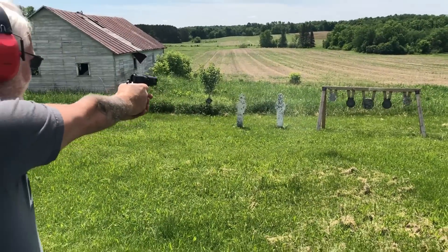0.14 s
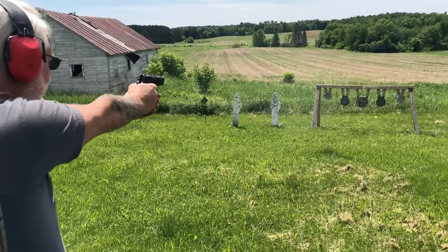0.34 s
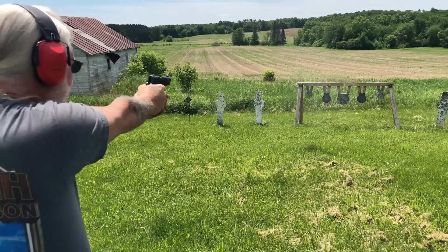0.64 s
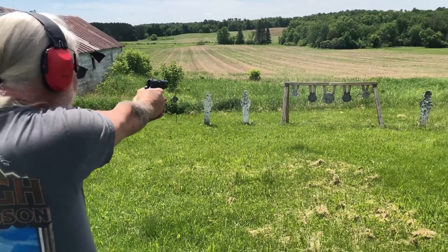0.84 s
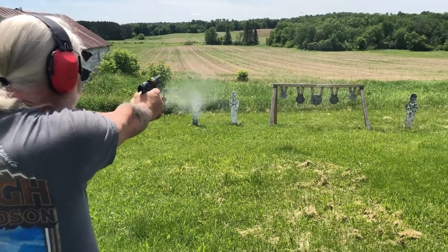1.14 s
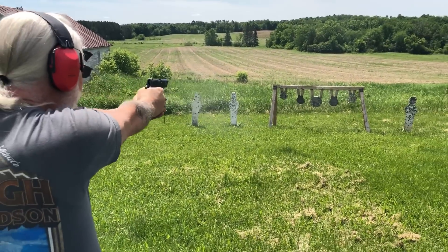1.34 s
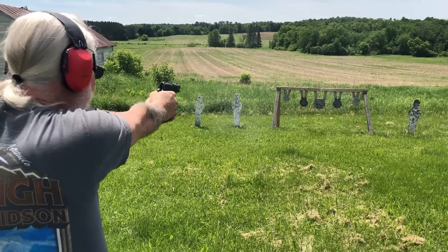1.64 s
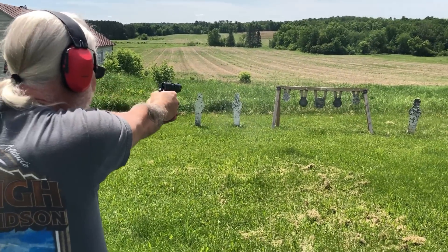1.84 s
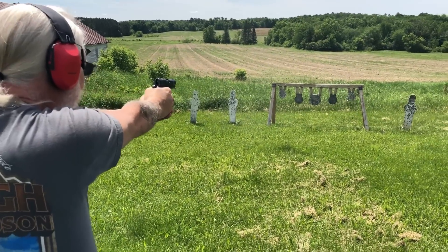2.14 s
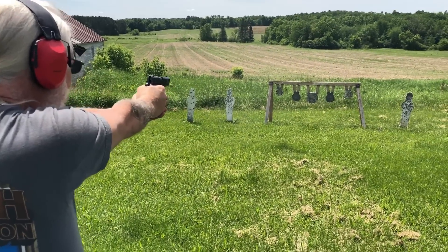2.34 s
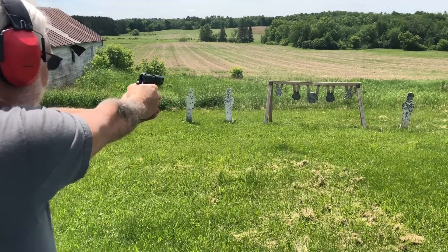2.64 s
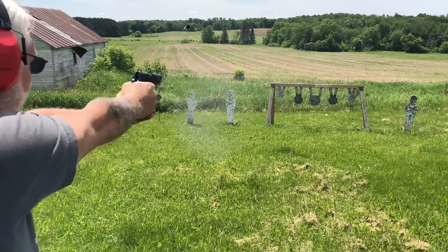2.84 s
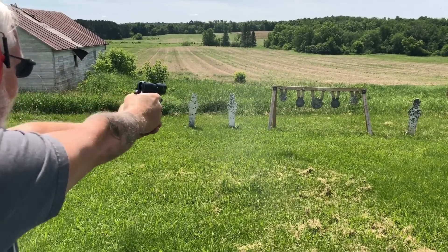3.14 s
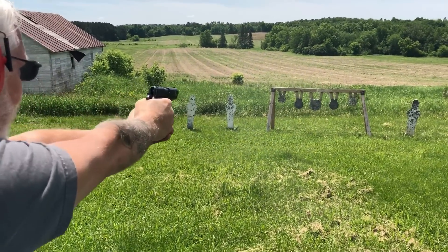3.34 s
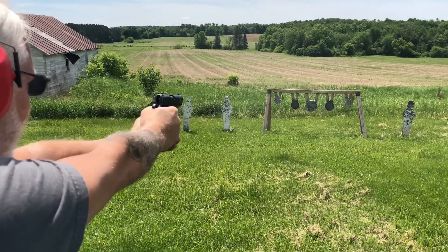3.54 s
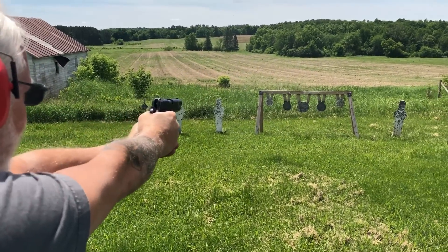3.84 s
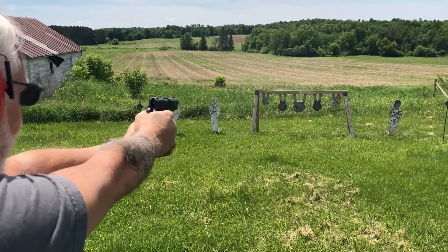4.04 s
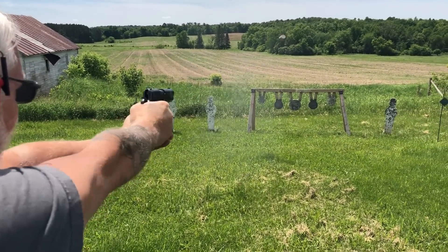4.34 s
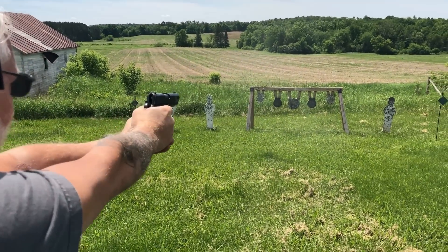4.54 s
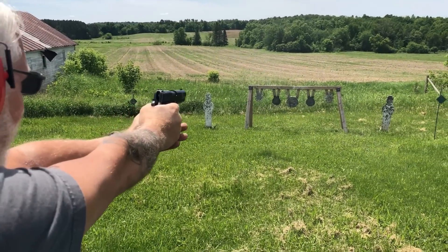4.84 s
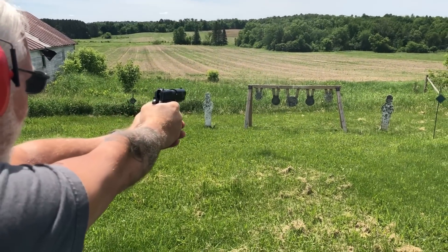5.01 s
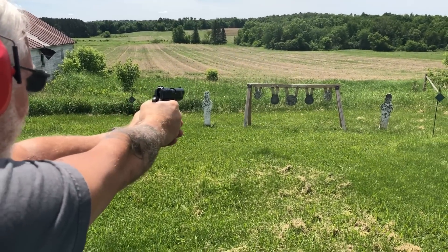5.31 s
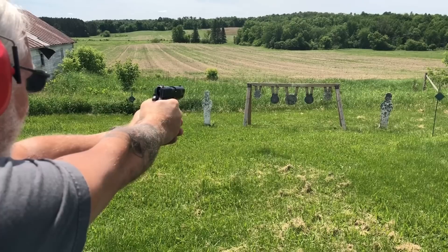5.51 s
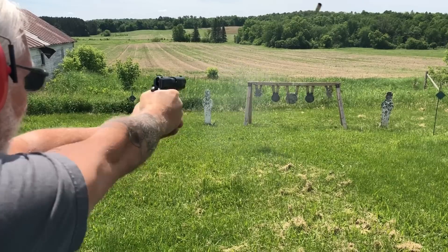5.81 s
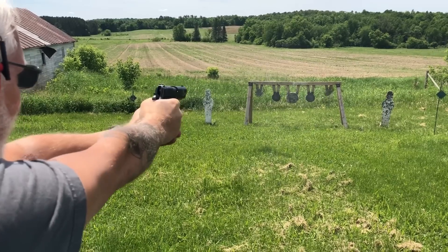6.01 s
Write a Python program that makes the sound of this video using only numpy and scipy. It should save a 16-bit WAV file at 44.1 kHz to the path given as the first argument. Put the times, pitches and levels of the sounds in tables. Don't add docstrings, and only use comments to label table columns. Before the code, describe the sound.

A handgun fires four single shots about one and a half seconds apart in an open grassy field. Each is a sharp overloaded crack with a short low boom, a target smack almost at once, and echoes rolling off barn and trees. The first and last hits ping on steel. Between them are a faint murmur and tiny clicks, captured on a phone just behind the shooter.

```python
import sys
import numpy as np
from scipy import signal
from scipy.fft import rfft, irfft
from scipy.io import wavfile
from scipy.ndimage import uniform_filter1d

SR = 44100
rng = np.random.default_rng(int(sys.argv[2]) if len(sys.argv) > 2 else 0)


def master(y):
    cut = np.clip(np.atleast_2d(y).T, -1, 1)
    pcm = np.round(cut * 32767)
    wavfile.write(sys.argv[1], SR, pcm.astype(np.int16))


def gain_from_decibels(decibels):
    exponent = np.asarray(decibels, float) / 20
    return 10 ** exponent


N = 272097

# start in seconds, muzzle pulse in dB, blast in dB, bullet strike in dB,
# ms until the limiter lets the hiss back.
SHOTS = [
    (1.327, -6.5, 3, 4.5, 101),
    (2.933, -19, 1.5, 0.5, 86),
    (4.445, -11, 1.5, 2.5, 86),
    (5.900, -10, 0, 2.5, 83.4),
]
# thump in dB, swell before the strike in dB, returning hiss in dB,
# its rise in ms per 10 dB, bright tail in dB.
SHOT_RETURNS = [(-6, -3.5, -2.5, 23.5, 3.5), (1, 0.5, 1.5, 8.5, 1.5), (5, 0, 3, 7.5, -1.5),
                (1.5, 3, -1, 15, -1)]
# delay in seconds, body in dB, thump in dB, rise and fall in ms per 10 dB.
BOOM_RETURNS = [(.107, -16.5, -45, 13, 12), (0.129, -17.5, -38, 7, 11), (0.147, -26.5, -44.5, 9, 38),
                (.235, -35.5, -52.5, 16, 39), (.300, -46.5, -67.5, 18, 97)]
# delay in seconds, crack in dB, hiss in dB, rise and fall in ms per 10 dB.
CRACK_RETURNS = [(0.125, -25.5, -28.5, 25.5, 44.5), (.230, -42.5, -54, 34, 44),
                 (.330, -60.5, -70, 30, 101.5)]
# delay in seconds, roll in dB, rustle in dB, rise and fall in ms per 10 dB.
FAR_RETURNS = [(.46, -59, -63, 40, 298), (.95, -53.5, -64.5, 33.5, 298), (1.10, -53, -70.5, 80, 101.5),
               (1.25, -52, -71, 81, 108.5), (1.41, -53, -61.5, 10, 259), (1.52, -54, -60, 39, 98.5),
               (1.70, -47, -61, 60.5, 157.5), (1.81, -48.5, -58, 41, 251)]
# frequency in Hz, width in Hz, level in dB.
BLAST_RESONANCES = [(210, 33, -17.5), (493, 170, -6.5), (843, 300, -1), (1204, 790, -4)]
# start in seconds, ring in dB, ms until the limiter has let go.
STEEL_HITS = [
    (1.388, -21, 38),
    (5.971, -17.5, 7.3),
]
# frequency in Hz, level in dB, t60 in seconds.
FIRST_PLATE = [(3537, -11.5, 0.56), (4130, -30, 0.35), (5529, -26.5, 0.3), (6166, 5, 0.27),
               (6158, -33, 0.99), (7470, -36, 0.4), (8200, -13, 0.29), (9180, -21, 0.22), (13700, -9, 0.12)]
SECOND_PLATE = [(3600, -18.5, 0.42), (4950, -17, 0.37), (6210, -14, 0.4), (7500, -24, 0.4),
                (4420, -22, 0.22), (5240, -34, 0.6), (5850, 0, 0.12), (6220, -5, 0.076), (8720, 0.5, 0.22),
                (9410, -14, 0.35), (11330, -7, 0.21), (14020, -11, 0.19), (14900, -30, 0.24)]
# frequency in Hz, density in dB per Hz.
FIELD_COLOUR = [(18, -44), (30, -25), (86, -3.5), (134, -7), (215, -17), (280, -17), (600, 3), (913, 1.5),
                (2540, -20), (2750, -19), (3980, -25), (7670, -44.5), (14400, -42), (16000, -42)]
# roll in dB, rustle in dB, rumble in dB.
MURMUR = [(-59.5, -68, -77.5), (-61, -70, -78.5), (-57.5, -71, -79), (-58, -75, -80), (-61, -69, -79)]
# start in seconds, length in seconds, level in dB.
AIRY_SPELLS = [(.0, 0.29, -83), (0.296, 0.45, -90), (.72, 0.19, -83), (.95, .04, -81), (1.01, .05, -74),
               (1.095, .05, -79), (1.76, .12, -82), (2.26, 0.24, -86), (2.606, .06, -82), (3.72, .03, -83.5),
               (4.32, .05, -89), (5.097, .008, -72), (5.297, .008, -78)]
# start in seconds, peak in dB, frequency in Hz.
TICKS = [(1.689, -48.5, 2360), (1.7794, -57, 1740), (1.847, -43, 2870), (1.8796, -63, 1990),
         (3.309, -51, 1500), (3.4531, -50, 1502), (3.483, -59.5, 2130), (4.3264, -49, 5000),
         (4.3694, -46, 2240), (4.4046, -37, 1670), (5.0974, -60, 1588), (5.299, -53, 1930),
         (5.6994, -65, 1690), (5.7694, -65, 1730)]
# start in seconds, level in dB, frequency in Hz, t60 in seconds.
KNOCKS = [(3.670, -48.5, 101, 0.14), (3.675, -48, 210, 0.085), (4.512, -22.5, 62, 0.13),
          (5.53, -60, 50, .15)]
# centre in seconds, top in Hz, slope in Hz per second, half length in seconds, level in dB.
CHIRPS = [
    (5.704, 5770, 99400, .004, -70),
    (5.768, 7200, 230000, 0.007, -66.5),
]
# centre in seconds, edge in Hz, floor in dB, two kept lines in
# Hz.
LOUD_GAPS = [(1.341, 1740, -30, 4190, 5706), (1.365, 2000, -7, 7900, 6305), (1.530, 6550, -9, 9200, 8500),
             (1.578, 2300, -19, 4270, 8500), (1.625, 2500, -19, 9200, 8500),
             (2.966, 3500, -14, 5430, 8600), (3.034, 1770, -6, 4880, 12200),
             (3.187, 2476, -29, 10800, 9100), (4.486, 4000, -22, 6940, 8800),
             (6.082, 1900, -22, 4950, 3600), (6.100, 6400, -14, 7500, 14020)]
# centre in seconds, edge in Hz.
QUIET_GAPS = [(.262, 5060), (.518, 4500), (.553, 4240), (.927, 2500), (.998, 3000), (1.075, 2800),
              (1.895, 4000), (2.180, 3500), (2.238, 4500), (2.371, 3980), (3.397, 3060), (3.591, 4000),
              (3.540, 5500), (3.803, 4400), (3.835, 4400), (4.262, 4000), (4.292, 3000), (5.250, 3500),
              (5.329, 2000), (5.630, 3400)]

EARLIER_SHOT_S = -0.583
BLAST_S, STRIKE_S, SWELL_S = 0.003, 0.0605, 0.050


def band(low_hz, high_hz, order=2):
    sos = signal.butter(order, [low_hz, high_hz], "band", fs=SR, output="sos")
    x = signal.sosfilt(sos, rng.standard_normal(N))
    return x / np.std(x)


def drift(rate_hz):
    r = np.exp(-2 * np.pi * rate_hz / SR)
    slow = signal.lfilter([1], [1, -2 * r, r * r], rng.standard_normal(N + SR))[SR:]
    return slow / np.std(slow)


def ring(clicks, hz, t60_s):
    r = gain_from_decibels(-60 / (t60_s * SR))
    w = 2 * np.pi * hz / SR
    return signal.lfilter([0, np.sin(w)], [1, -2 * r * np.cos(w), r * r], clicks + 1e-18)


def click(s):
    return 1. * (np.arange(N) == round(s * SR))


def louder(row, db, second_db=0):
    return (row[0], row[1] + db, row[2] + db + second_db, *row[3:])


def since_shot():
    times = np.array([EARLIER_SHOT_S] + [row[0] for row in SHOTS])
    t = np.arange(N) / SR
    latest = np.searchsorted(times, t) - 1
    return times, latest, t - times[latest]


def arrivals(times, rows_per_shot, lead_s):
    power = np.zeros((2, N))
    for shot_s, rows in zip(times, rows_per_shot):
        first = max(round((shot_s - lead_s) * SR), 0)
        for delay_s, first_db, second_db, rise_ms, fall_ms in rows:
            s = shot_s + delay_s
            last = min(round((s + fall_ms / 200) * SR), N)
            near = np.arange(first, last)
            ms = 1000 * (near / SR - s)
            rise_db = 10 * ms / max(rise_ms, .1)
            fall_db = -10 * ms / max(fall_ms, .1)
            shape_db = np.where(ms < 0, rise_db, fall_db)
            power[:, near] += gain_from_decibels(shape_db + np.array([[first_db], [second_db]])) ** 2
    return np.sqrt(power)


def field():
    times, latest, age_s = since_shot()
    t = np.arange(N) / SR
    roll, rustle = arrivals(times, [FAR_RETURNS] * len(times), 0) * (np.minimum(age_s, 1) > .25)

    layers = np.zeros((4, N))
    edges_hz = 30 * 2 ** np.arange(0, 9.1, .5)
    together = drift(14)
    colour_hz, colour_db = np.transpose(FIELD_COLOUR)
    for low_hz, high_hz in zip(edges_hz, edges_hz[1:]):
        hz = np.sqrt(low_hz * high_hz)
        level_db = np.interp(np.log(hz), np.log(colour_hz), colour_db) + 10 * np.log10(hz)
        lumps_db = 0.83 * together + 2.1 * drift(25)
        layers[np.searchsorted([300, 1700, 7000], hz)] += gain_from_decibels(level_db + lumps_db) * band(low_hz, high_hz)

    motor = ring(rng.standard_normal(N), 120, 2.2 / 33)
    layers[0] += gain_from_decibels(-4) * motor * np.std(layers[0]) / np.std(motor)

    roll_db, rustle_db, rumble_db = np.array(MURMUR)[latest].T
    spells = sum(gain_from_decibels(db) * ((t > s) & (t < s + length_s)) for s, length_s, db in AIRY_SPELLS)
    gains = [gain_from_decibels(rumble_db + 9.5 * age_s),
             np.hypot(roll, gain_from_decibels(roll_db)),
             np.hypot(rustle, gain_from_decibels(rustle_db)),
             uniform_filter1d(spells, size=200) + gain_from_decibels(-94.5 + 3 * drift(6))]
    return sum(gain * x / np.std(x) for gain, x in zip(gains, layers))


def crack():
    blast = (0, -9, -11, -1, 10.5)
    strike = (STRIKE_S, -15, -18, 1.6, 3.1)
    swell = (SWELL_S, -25.5, -22, 20, 9.1)
    rows_per_shot = []
    for (*_, strike_db, back_ms), (_, swell_db, back_db, rise_ms, tail_db) in zip(SHOTS, SHOT_RETURNS):
        hiss_back = (back_ms / 1000, -23.5, -19.5, rise_ms, 18)
        rows_per_shot.append([blast, louder(strike, strike_db), louder(swell, swell_db), CRACK_RETURNS[0],
                              louder(hiss_back, back_db), louder(CRACK_RETURNS[1], tail_db), CRACK_RETURNS[2]])
    crack_gain, hiss_gain = arrivals([row[0] for row in SHOTS], rows_per_shot, 0.0034)

    low_top, high_top = band(5500, 10000, order=3), band(10000, 15800, order=3)
    air_loss = gain_from_decibels(-46 * since_shot()[2])
    out = crack_gain * band(1300, 5500) + hiss_gain * (.7 * low_top + .8 * high_top * air_loss)

    ahead = 0.58 * (low_top + high_top) + gain_from_decibels(7) * band(1000, 3200)
    t = np.arange(N) / SR
    for s, peak_db, blast_db, strike_db, _ in SHOTS:
        fronts = gain_from_decibels(peak_db) * click(s) + gain_from_decibels(-10 + strike_db) * click(s + STRIKE_S)
        out += np.convolve(fronts, np.linspace(1, -1, num=16))[:N]
        early = (t > s - 0.022) & (t < s)
        pulsing_db = 2.3 * np.cos(2 * np.pi * (t - s) * SR / 128)
        out += gain_from_decibels(-46.5 + 2 * blast_db + pulsing_db) * early * ahead
    return out


def boom():
    blast = (BLAST_S, -9, -26, 7.6, 11)
    strike = (STRIKE_S, -17.5, -37.5, 1.6, 3.6)
    swell = (SWELL_S, -21.5, -37.5, 15, 8.9)
    rows_per_shot = []
    for (_, _, blast_db, strike_db, _), (thump_db, swell_db, *_) in zip(SHOTS, SHOT_RETURNS):
        direct = [louder(blast, blast_db, thump_db), louder(strike, strike_db), louder(swell, swell_db, thump_db)]
        rows_per_shot.append(direct + BOOM_RETURNS)
    body_gain, thump_gain = arrivals([row[0] for row in SHOTS], rows_per_shot, 0.04)

    grains = rng.standard_normal(N) * gain_from_decibels(3.0 * drift(120))
    body = np.zeros(N)
    for k, (hz, width_hz, level_db) in enumerate(BLAST_RESONANCES):
        body += (-1) ** k * gain_from_decibels(level_db) * np.sqrt(width_hz) * ring(grains, hz, 2.0 / width_hz)
    body = signal.sosfilt(signal.butter(2, [280, 1900], "band", fs=SR, output="sos"), body)
    return body_gain * body / np.std(body) + thump_gain * band(45, 220)


def steel():
    out, t = np.zeros(N), np.arange(N) / SR
    for (s, ring_db, release_ms), plate in zip(STEEL_HITS, [FIRST_PLATE, SECOND_PLATE]):
        modes = sum(gain_from_decibels(level_db) * ring(click(s), hz, t60_s) for hz, level_db, t60_s in plate)
        release = np.clip(0.36 + 1000 * (t - s) / release_ms, 0, 1.4)
        out += gain_from_decibels(ring_db + 2.0 * drift(30)) * modes * release
    return out


def ticks():
    dry_ticks = sum(gain_from_decibels(peak_db + 8.0) * ring(click(s), hz, 6.8 / hz) for s, peak_db, hz in TICKS)
    knocks = sum(gain_from_decibels(knock_db) * ring(click(s), hz, t60_s) for s, knock_db, hz, t60_s in KNOCKS)
    dry_ticks = signal.sosfilt(signal.butter(2, 5000, fs=SR, output="sos"), dry_ticks)
    return dry_ticks + signal.sosfilt(signal.butter(2, 300, fs=SR, output="sos"), knocks)


def bird():
    t = np.arange(N) / SR
    out = np.zeros(N)
    for s, top_hz, slope, half_s, level_db in CHIRPS:
        mean_hz = top_hz - slope * np.abs(t - s) / 2
        swell = np.exp(-((t - s) / half_s) ** 4)
        out += gain_from_decibels(level_db) * swell * np.sin(2 * np.pi * mean_hz * (t - s))
    return out


def scene():
    return (field() + crack() + boom() + steel() + ticks() + bird())[None]


def thin_treble(x):
    out, size = x.copy(), round(25 * SR / 1000)
    frames = LOUD_GAPS + [(s, edge_hz, -12) for s, edge_hz in QUIET_GAPS]
    hz = np.fft.rfftfreq(size, 1 / SR)
    strays = 2 ** (1.8 * rng.random(size=(len(frames), 4)))
    for (s, edge_hz, floor_db, *kept_hz), stray in zip(frames, strays):
        start = round(s * SR) - size // 2
        part = slice(start, start + size)
        lines_hz = [*kept_hz, *(edge_hz * stray)]
        kept = sum(gain_from_decibels(12.5) * np.exp(-((hz - line_hz) / 60.0) ** 2) for line_hz in lines_hz)
        change = (hz > edge_hz) * (kept + gain_from_decibels(floor_db) - 1)
        out[part] += irfft(change * rfft(out[part]), size) * np.hanning(size) ** 0.51
    return out


def low_pass(x):
    return signal.sosfilt(signal.butter(12, 17000, fs=SR, output="sos"), x)


def record(dry):
    x = thin_treble(1.003 * np.tanh(dry[0] / 1.087))
    x = signal.sosfilt(signal.cheby2(10, 40, 16200, fs=SR, output="sos"), x)
    x = signal.sosfilt(signal.butter(2, 40.0, "high", fs=SR, output="sos"), x)
    return low_pass(x[None])


dry = scene()
out = record(dry)
master(out)
```